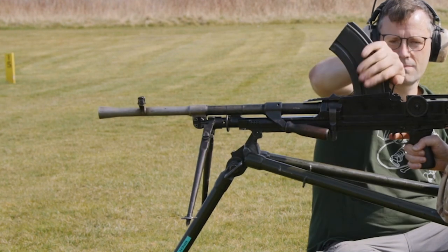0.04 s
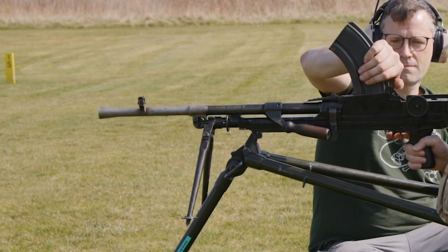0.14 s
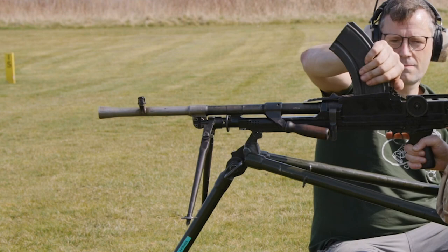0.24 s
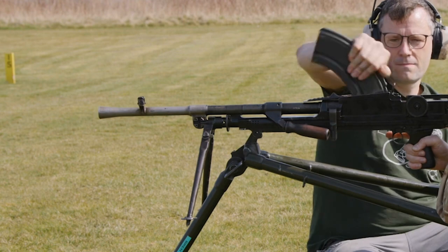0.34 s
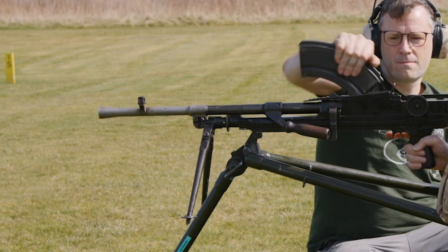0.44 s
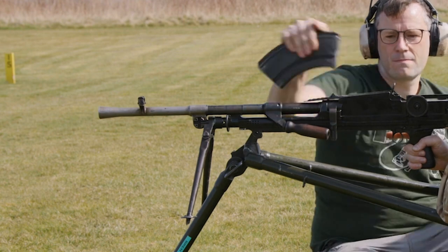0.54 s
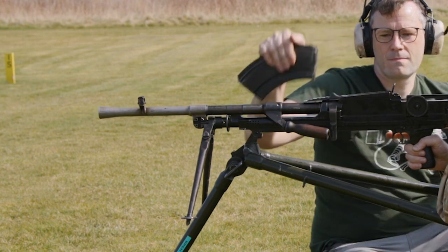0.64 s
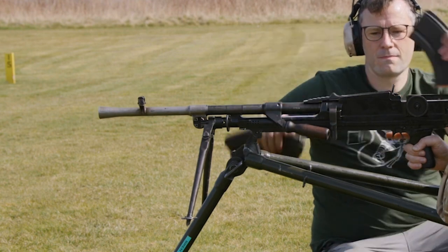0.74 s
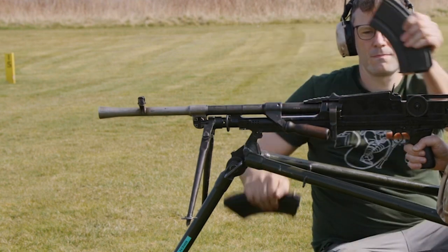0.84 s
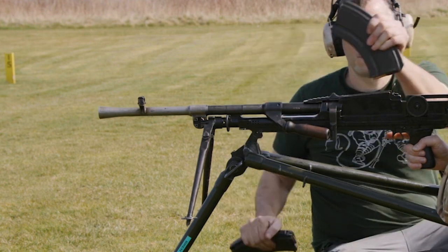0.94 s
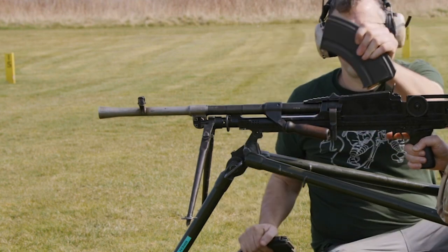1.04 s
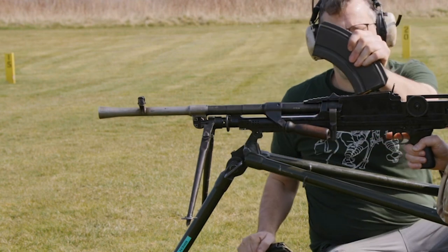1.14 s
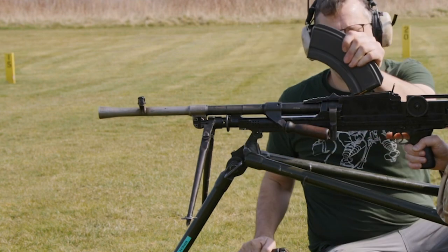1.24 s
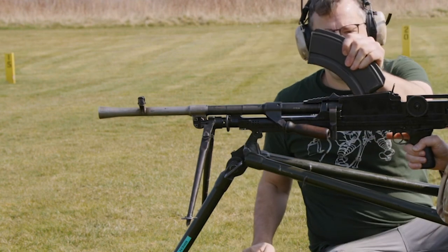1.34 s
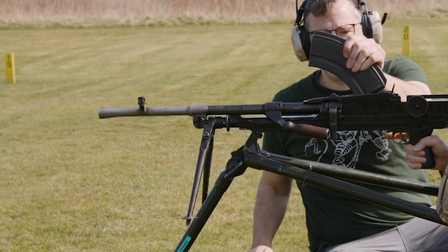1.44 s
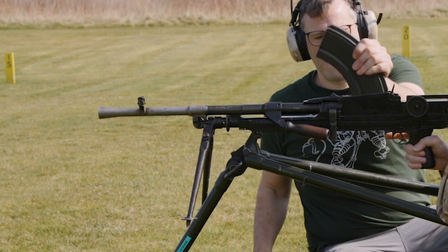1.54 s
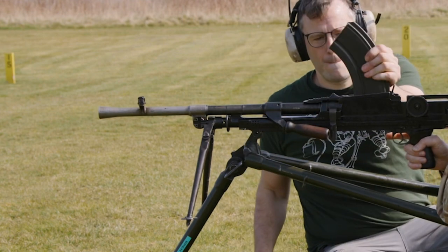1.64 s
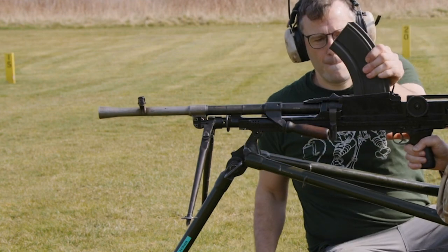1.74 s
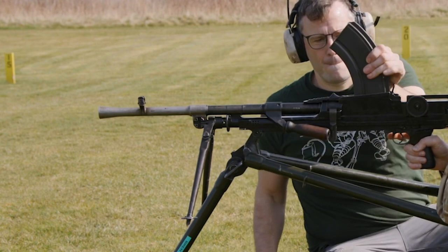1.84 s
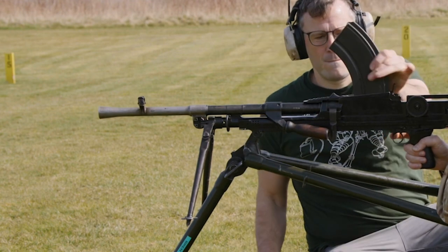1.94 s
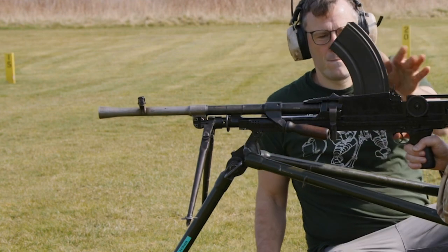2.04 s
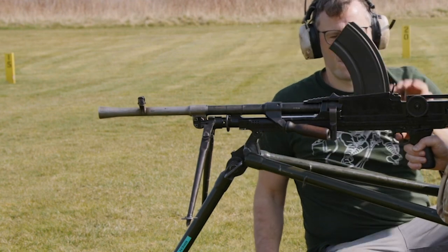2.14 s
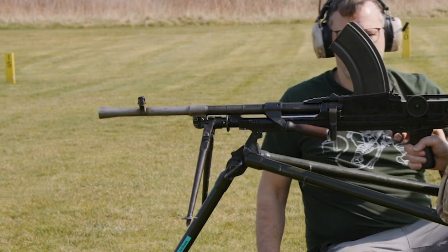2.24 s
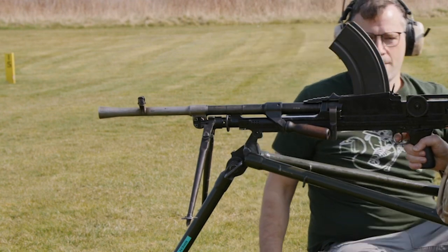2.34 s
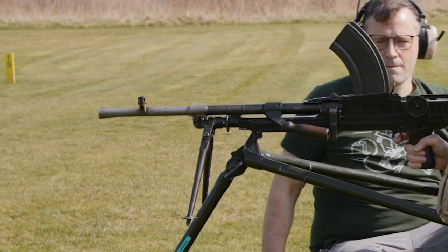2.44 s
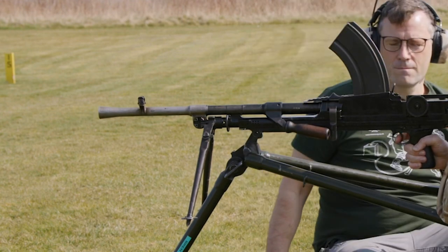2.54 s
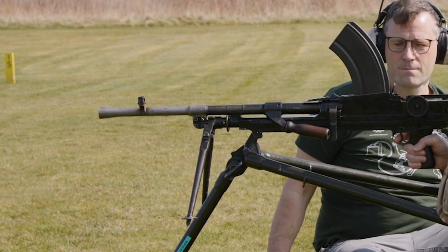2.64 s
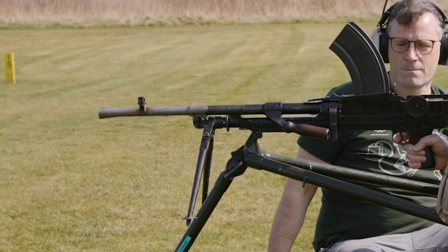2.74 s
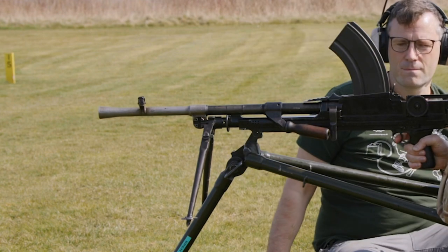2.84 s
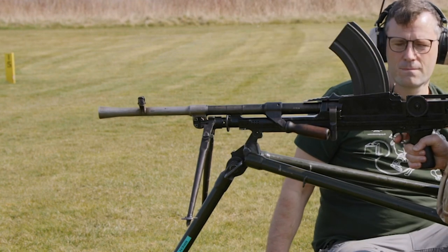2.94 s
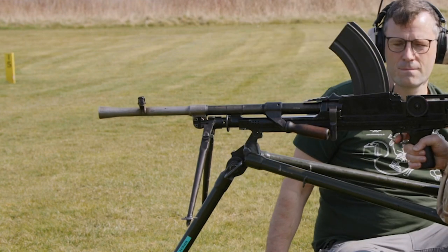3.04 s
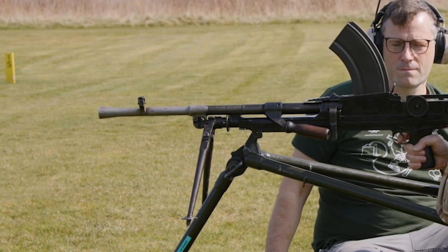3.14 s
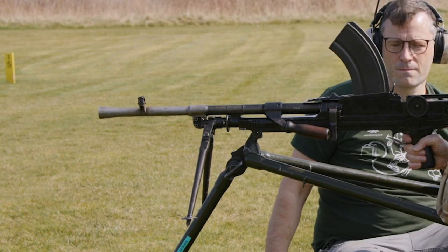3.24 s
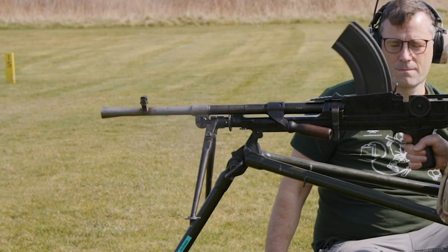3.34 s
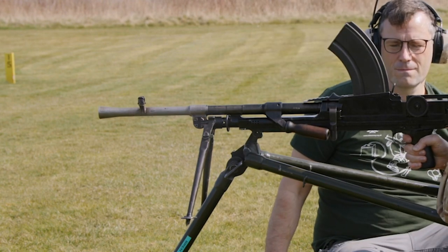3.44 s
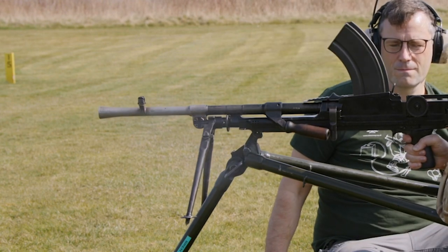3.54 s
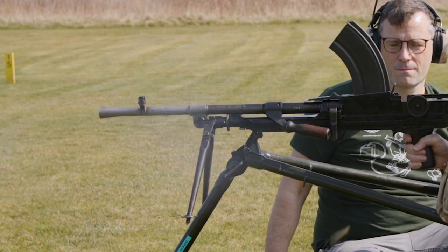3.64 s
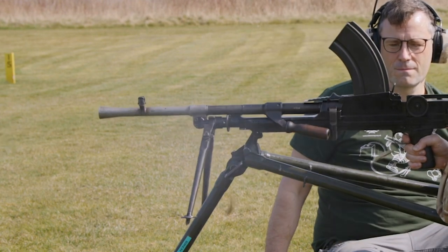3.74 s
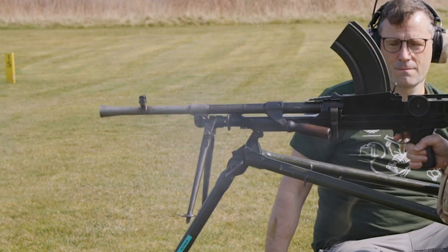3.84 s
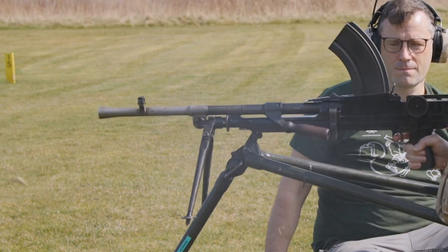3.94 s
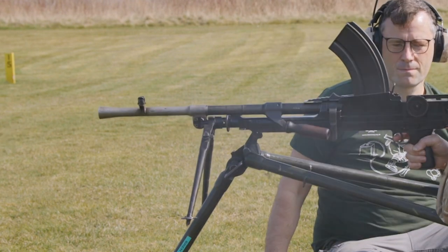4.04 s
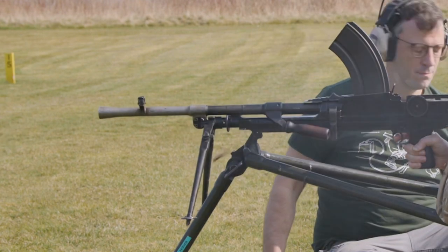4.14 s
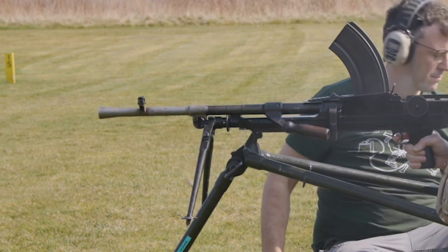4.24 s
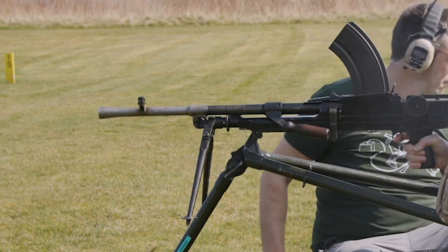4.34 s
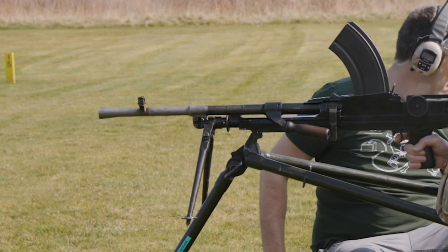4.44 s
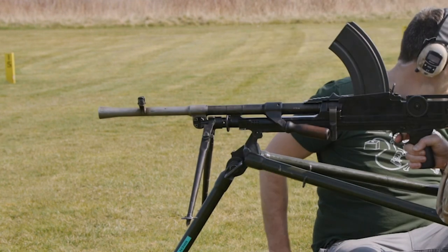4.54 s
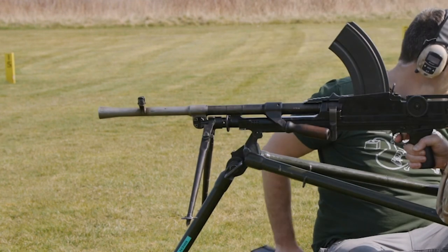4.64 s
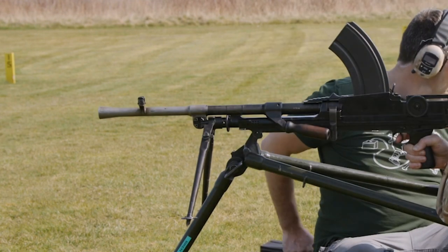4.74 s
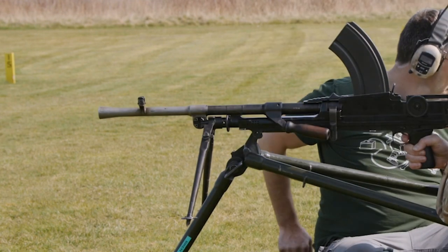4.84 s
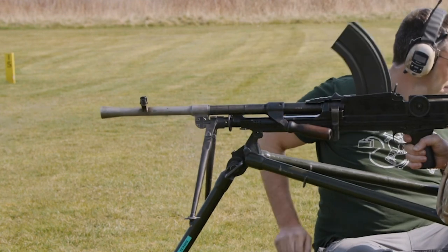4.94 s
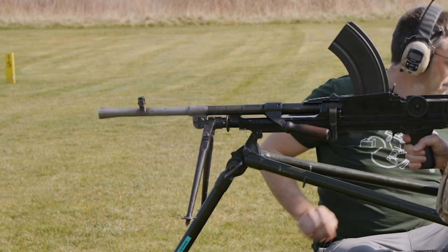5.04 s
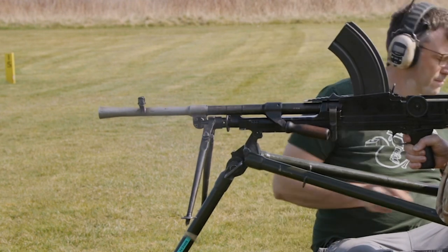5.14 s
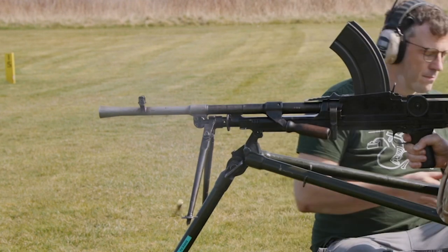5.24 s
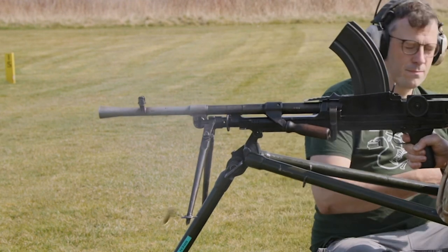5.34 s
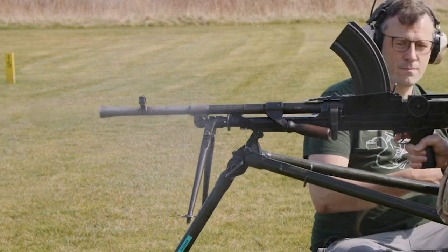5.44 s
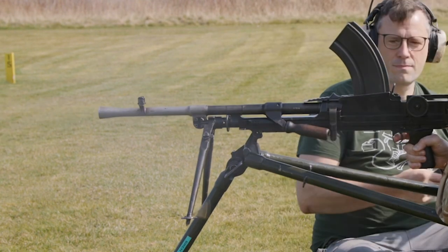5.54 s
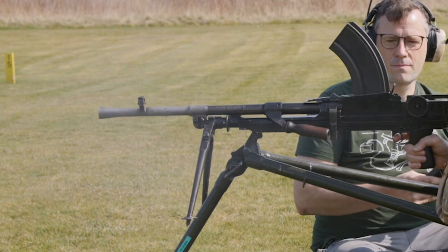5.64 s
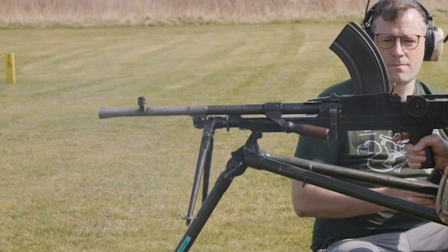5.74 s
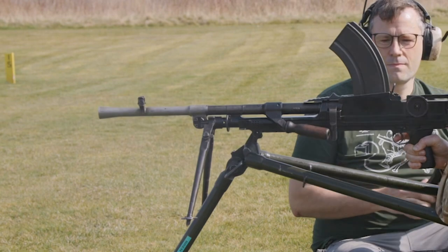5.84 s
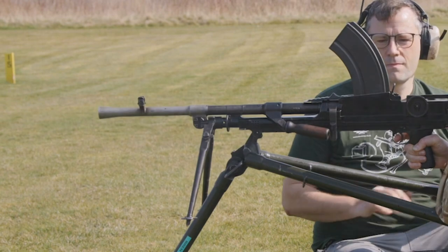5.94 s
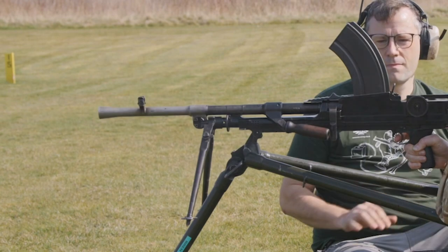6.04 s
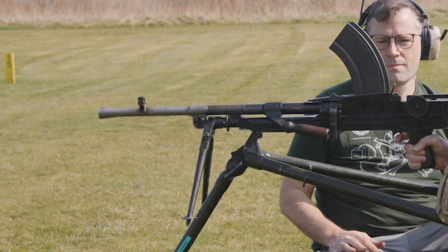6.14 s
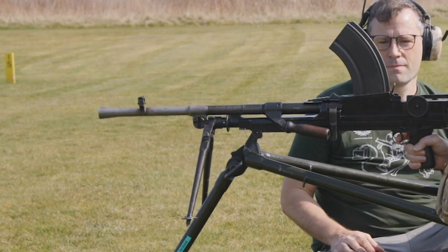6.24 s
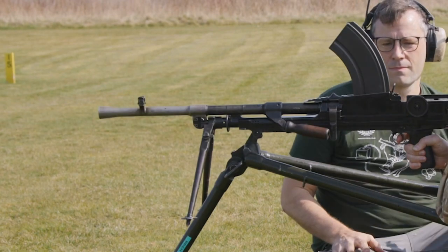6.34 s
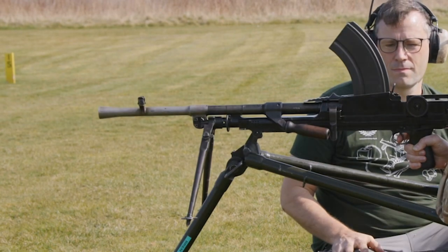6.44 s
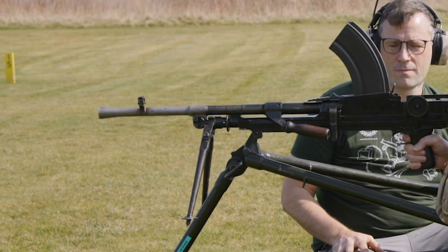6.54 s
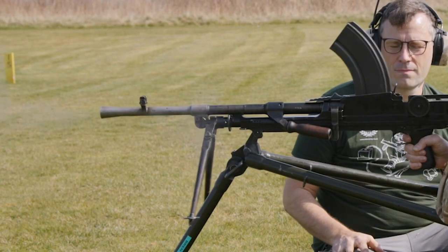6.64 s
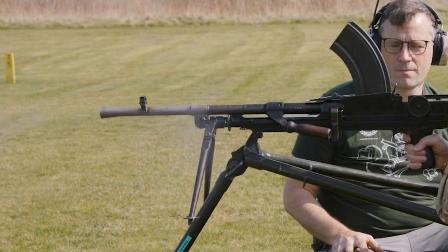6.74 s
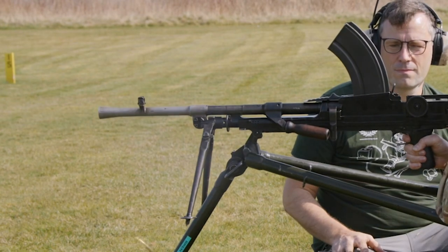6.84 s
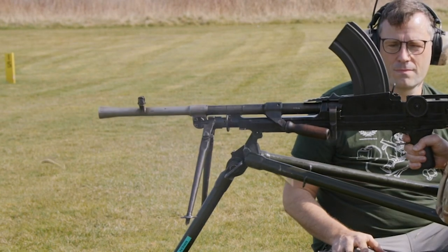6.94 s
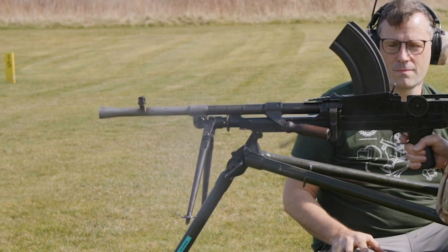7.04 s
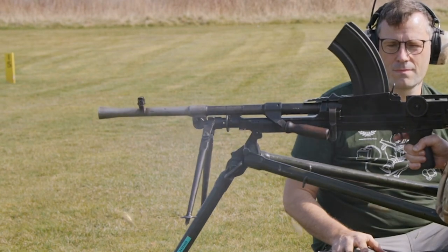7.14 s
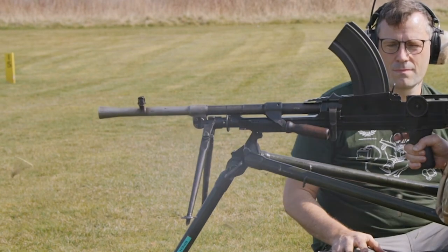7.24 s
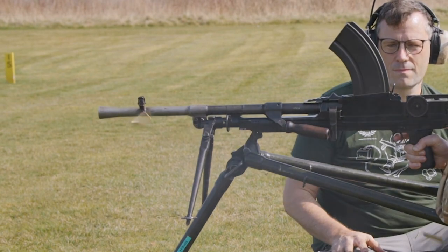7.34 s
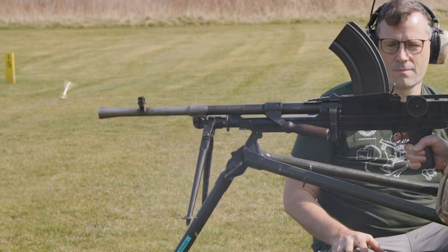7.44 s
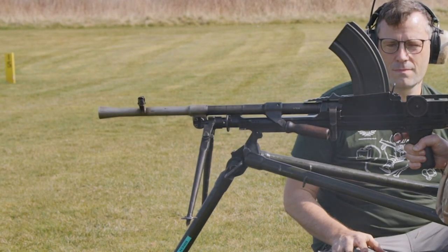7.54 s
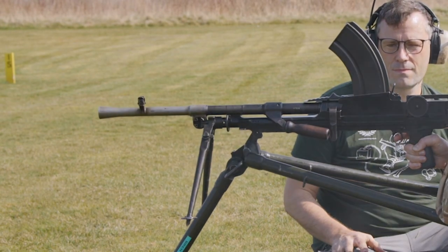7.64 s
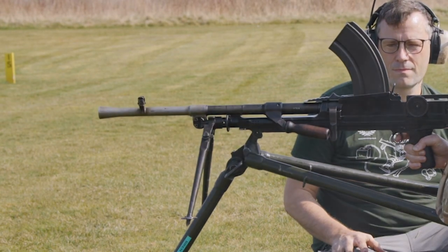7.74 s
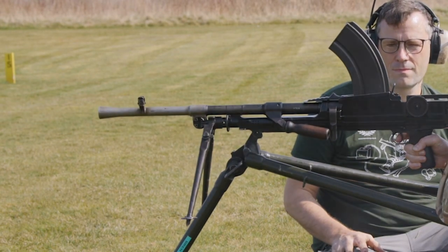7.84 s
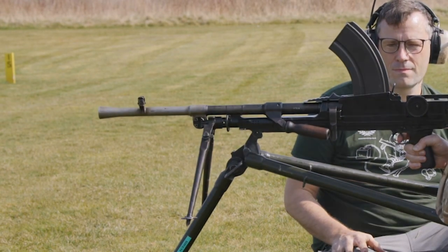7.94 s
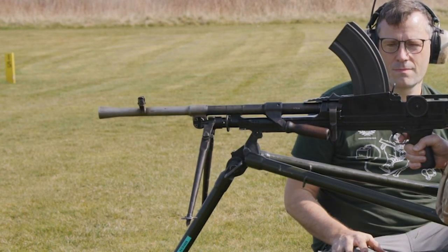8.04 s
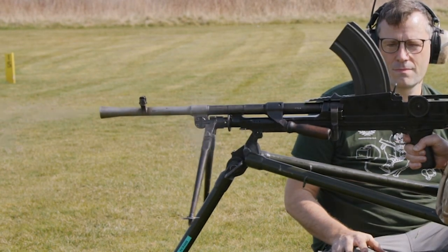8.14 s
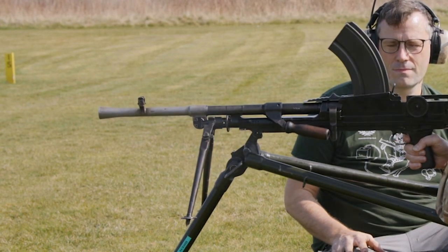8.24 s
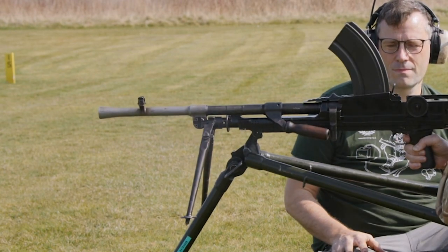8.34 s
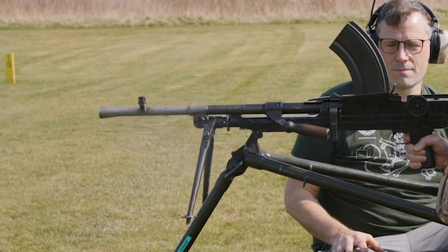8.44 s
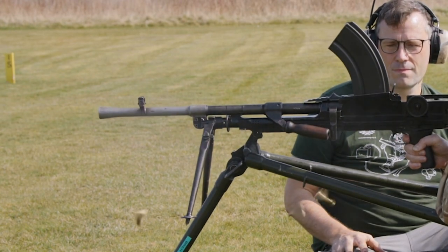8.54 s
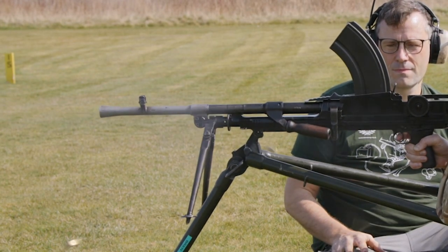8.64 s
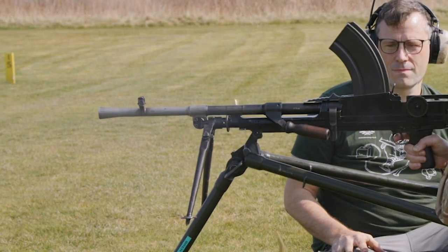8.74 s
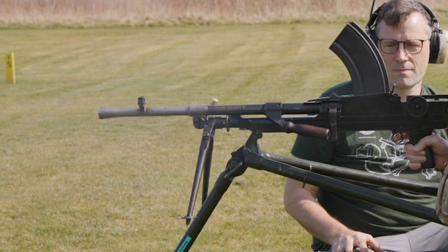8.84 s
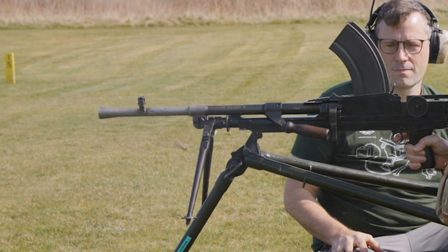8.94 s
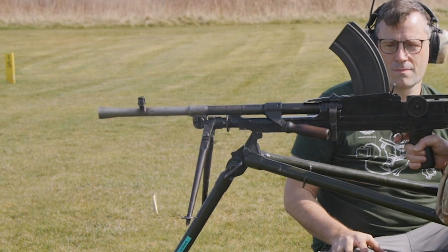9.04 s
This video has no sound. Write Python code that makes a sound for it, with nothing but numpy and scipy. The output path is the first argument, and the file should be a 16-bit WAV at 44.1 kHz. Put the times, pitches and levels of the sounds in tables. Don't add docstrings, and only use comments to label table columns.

```python
import sys
import numpy as np
from scipy import signal
from scipy.fft import rfft, irfft
from scipy.io import wavfile
from scipy.ndimage import uniform_filter1d

SR = 44100
rng = np.random.default_rng(int(sys.argv[2]) if len(sys.argv) > 2 else 0)


def dump(signal):
    limited = np.clip(np.atleast_2d(signal).T, -1, 1)
    pcm = np.round(limited * 32767).astype(np.int16)
    wavfile.write(sys.argv[1], SR, pcm)


def voltage_ratio(decibels):
    exponent = np.asarray(decibels, float) / 20
    return 10 ** exponent


N = 400428


def place(times, rows):
    out = np.zeros(N + SR + rows.shape[1])
    for s, row in zip(times, rows):
        i = int(s * SR)
        out[i:i + len(row)] += row
    return out[:N]


def columns(table):
    return np.array(table).T[:, :, None]


def decay(t, t60_s):
    return np.exp(-3 * np.log(10) * t / t60_s)


def sine(cycles):
    return np.sin(2 * np.pi * cycles)


def band(x, hz, width_hz):
    return signal.lfilter(*signal.iirpeak(min(hz, .4 * SR), hz / width_hz, SR), x)


def band3(x, hz, width_hz):
    return band(band(band(x, hz, width_hz), hz, width_hz), hz, width_hz)


def lowpass(x, hz):
    return signal.sosfilt(signal.butter(4, hz, fs=SR, output="sos"), x)


def colour(x, points):
    hz, db = np.transpose(points)
    f = np.fft.rfftfreq(x.shape[-1], 1 / SR) + 1
    gain = voltage_ratio(np.interp(np.log(f), np.log(hz), db))
    y = irfft(rfft(x) * gain, x.shape[-1])
    return y / y.std()


def walk(rate_hz):
    k = int(SR / rate_hz)
    held = np.repeat(rng.standard_normal(N // k + 1), k)
    return uniform_filter1d(uniform_filter1d(held, k), k)[:N]


def curve(points):
    return np.interp(np.arange(N) / SR, *np.transpose(points))


def ends():
    shots = np.array(SHOTS).reshape(len(BURSTS), -1, len(SHOTS[0]))
    return shots[:, 0], shots[:, -1]


# time_s, level_db
WIND_LEVEL = [(0, -60.5), (.2, -44), (.36, -45), (.42, -52), (.8, -61.5), (1.05, -51), (1.2, -56.5),
              (1.6, -50.5), (1.88, -44.5), (1.97, -56.5), (2.1, -42.5), (2.26, -48.5), (2.55, -45),
              (4, -48), (4.84, -49.5), (5.6, -56.5), (7.5, -59.5), (9.08, -53)]
# freq_hz, density_db
WIND_SPECTRUM = [(12, -32.5), (35, -9.5), (90, 0), (157, -4), (280, -18), (450, -30.5), (580, -65.5),
                 (990, -120)]
DEEP_HZ, DEEP_WIDTH_HZ, DEEP_DB, DEEP_SHARE = 36, 30, -9, .85


def wind():
    gust_db = curve(WIND_LEVEL)
    lumps = voltage_ratio(gust_db + 3.5 * walk(30)) * colour(rng.standard_normal(N), WIND_SPECTRUM)
    deep = band(band(rng.standard_normal(N), DEEP_HZ, DEEP_WIDTH_HZ), DEEP_HZ, DEEP_WIDTH_HZ)
    deep_db = DEEP_DB + DEEP_SHARE * gust_db + 3 * walk(7.3)
    return lumps + voltage_ratio(deep_db) * deep / deep.std()


# time_s, level_db
HUM_LEVEL = [(0, -59.5), (.89, -64), (1.9, -59.5), (4.8, -62), (6, -66.5), (8, -65.5), (9.08, -59.5)]
# freq_hz, density_db
HUM_SPECTRUM = [(180, -24.5), (300, -11), (607, -6), (1400, -10.5), (2610, -26), (4770, -29), (6000, -33.5),
                (16000, -42)]
ROLL_DB, ROLL_T60_S, ROLL_SHARE = -37, 0.79, 0.54


def hum():
    last = ends()[1]
    fade = decay(np.arange(SR) / SR, ROLL_T60_S)
    roll = place(last[:, 0], voltage_ratio(ROLL_DB + ROLL_SHARE * last[:, 1:2]) * fade)
    level = voltage_ratio(curve(HUM_LEVEL) + 0.9 * walk(4.6)) + roll
    return level * colour(rng.standard_normal(N), HUM_SPECTRUM)


# time_s, level_db
HISS_LEVEL = [(0, -92.5), (2, -87.5), (3.2, -73), (3.4, -100), (9.08, -100)]


def hiss():
    return voltage_ratio(curve(HISS_LEVEL)) * band(rng.standard_normal(N), 11000, 9000)


# freq_hz, width_hz, gain_db
RECEIVER = [(2350, 1300, 3), (3500, 200, 0), (4730, 840, -3), (4800, 730, -4), (6975, 2300, 0.5),
            (10600, 1700, -20.5)]
RATTLE_DB, RATTLE_T60_S = -30.5, 0.13


def knocks(rows, low_gain_db, mid_gain_db, high_gain_db):
    s, mid_db, low_db, low_hz, high_db, t60_s = columns(rows)
    t = np.arange(8192) / SR
    noise = rng.standard_normal((len(rows), 3, len(t)))
    fade = decay(t, np.clip(t60_s, .005, .2)) + voltage_ratio(RATTLE_DB) * decay(t, RATTLE_T60_S)
    fade = fade * np.minimum(t / (0.053 * t60_s), 1)

    hollow = band(band(band(noise[:, 0], 1000, 1300), 1000, 1300), 1050, 1600)
    low = voltage_ratio(low_db) * fade ** 0.73 * (0.58 * sine(low_hz * t) + 3.3 * hollow)
    low = place(s[:, 0], low)

    mid = place(s[:, 0], voltage_ratio(mid_db) * fade * noise[:, 1])
    ring = sum(voltage_ratio(db) * band(mid, hz, width_hz) for hz, width_hz, db in RECEIVER[:4])
    mid = band(band(mid, 2000, 2900) + ring, 3200, 5400)
    mid = band(mid, 3000, 6000)

    high = place(s[:, 0], voltage_ratio(high_db) * fade ** 1.215 * noise[:, 2])
    ring = sum(voltage_ratio(db) * band(high, hz, width_hz) for hz, width_hz, db in RECEIVER[3:])
    high = band(band(high, 12000, 12000) + ring, 5000, 9000)
    return voltage_ratio(low_gain_db) * low + voltage_ratio(mid_gain_db) * mid + voltage_ratio(high_gain_db) * high


# time_s, mid_db, low_db, low_hz, high_db
CLACKS = [(0.306, -14, -27, 620, -30.5), (0.4563, -38.5, -30, 606.3, -60.5),
          (.4809, -26, -36, 648.5, -55.5), (0.4892, -33.5, -39, 590, -59), (1.0894, -7, -17.5, 1055, -26),
          (1.1113, -23, -51, 969, -48.5), (1.1914, -11, -25.5, 804, -25), (1.1958, -9, -34.5, 980, -31),
          (1.251, -25, -38.5, 1017, -62.5), (1.338, -25.5, -33, 827, -43.5), (1.474, -14, -22, 1353, -37.5),
          (1.4866, -15, -27, 980, -30), (1.6132, -16.5, -32, 994, -32), (1.6292, -9.5, -32, 970, -16),
          (1.64, -23.5, -27.5, 900, -50.5), (1.8689, -24.5, -31.5, 1300, -62),
          (7.5487, -35, -54, 1448, -95.5), (7.679, -71, -47.5, 778, -84)]
CLACK_T60_S = 0.031
# time_s, mid_db, low_db, low_hz, high_db, t60_s
LATCH = (.3318, -5, -48, 996, -10, .016)
# time_s, level_db
TICKS_OUT = [(.0332, -43), (.083, -39.5), (.2633, -44.5), (.2725, -46), (.2783, -44), (.3, -44.5),
             (.321, -41), (.38, -52.5), (.355, -45), (.3914, -48.5), (.4105, -37), (.4224, -50.5),
             (.4314, -42.5)]
# time_s, level_db
TICKS_IN = [(1.15, -42), (1.1693, -27.5), (1.1746, -29), (1.2352, -32.5), (1.3179, -24), (1.3487, -26),
            (1.373, -30.5), (1.389, -40), (1.407, -44), (1.4336, -43.5), (1.4587, -38.5), (1.504, -39.5),
            (1.5195, -40.5), (1.5255, -31.5), (1.537, -43), (1.557, -41.5), (1.5665, -38), (1.672, -32.5),
            (1.6955, -34.5), (1.7175, -38), (1.7483, -29.5), (1.7757, -34), (1.9, -41.5), (1.9522, -35),
            (2.001, -43.5), (2.048, -42.5), (2.6024, -44)]
# low_db, low_hz, high_db, t60_s
EMPTY = (-6, 640, -26, .028)
FULL = (-13, 1000, -24, .034)


def hands():
    rows = [(*row, CLACK_T60_S) for row in CLACKS] + [LATCH]
    for ticks, (low_db, low_hz, high_db, t60_s) in ((TICKS_OUT, EMPTY), (TICKS_IN, FULL)):
        for s, db in ticks:
            hz = low_hz * rng.uniform(0.66, 1.1)
            rows.append((s, db, db + low_db, hz, db + high_db, t60_s))
    return knocks(rows, 5.47, -9.0, 1.7)


# time_s, peak_db, freq_hz
BUFFETS = [(.185, -35, 79.8), (.25, -37, 130), (.33, -36, 120), (.495, -44.5, 69.6), (.62, -44, 109.9),
           (1.535, -42, 65), (1.655, -34, 75), (1.87, -41.5, 109.9), (2.1, -30.5, 100.8),
           (2.49, -33.5, 124.4), (2.595, -34.5, 99.7), (2.845, -32.5, 75), (2.97, -34.5, 90)]
BUFFET_CYCLES, BUFFET_EDGE_DB = .8, -6


def buffets():
    s, db, hz = columns(BUFFETS)
    cycles = np.arange(4096) / SR * hz
    swing = sine(cycles) + voltage_ratio(BUFFET_EDGE_DB) * sine(1.9 * cycles)
    age = cycles / BUFFET_CYCLES
    return place(s[:, 0], voltage_ratio(db - 2.5) * swing * age * np.exp(1 - age))


# freq_hz, t60_s
SHEET = [(620, .07), (1790, 0.057), (2100, 0.027), (2540, 0.046), (2920, 0.035), (3305, .034),
         (3700, 0.034), (4250, 0.027), (4700, .022), (5044, .028), (5335, 0.019), (6300, .025),
         (6900, .016), (8100, .014)]
# time_s, level_db, favoured_hz, spread_octaves
BLOWS = [(.457, -36, 620, .3), (.482, -40, 620, .3), (1.0905, -36, 620, .3), (1.194, -40, 620, .3),
         (.308, -33, 2600, 0.63), (0.3319, -21.5, 5500, 0.76), (1.0898, -25.5, 2800, 1.07),
         (1.192, -29.5, 3500, .8), (1.1965, -30.5, 4200, 0.63), (1.2515, -42.5, 2900, 0.44),
         (1.339, -39.5, 2400, 0.62), (1.4748, -29, 1800, 0.82), (1.488, -31, 2600, 0.68),
         (1.566, -46, 3600, .3), (1.614, -34.5, 2200, 0.54), (1.63, -20, 5100, 0.326),
         (1.8689, -37.5, 1600, .6), (4.035, -25.5, 5500, 0.37)]


def sheet():
    s, db, favoured_hz, spread = columns(BLOWS)
    t, out = np.arange(4096) / SR, 0
    chance = rng.standard_normal((len(BLOWS), len(SHEET), 2, 1))
    for k, (hz, t60_s) in enumerate(SHEET):
        off = np.log2(hz / favoured_hz) / spread
        size = voltage_ratio(db - 6 * off ** 2 + 3 * chance[:, k, 0])
        detuned_hz = hz * (1 + 0.0071 * chance[:, k, 1])
        out = out + size * sine(detuned_hz * t) * decay(t, t60_s)
    return place(s[:, 0], out * np.minimum(t / .0006, 1))


# time_s, level_db, freq_hz, t60_s
PING = [(.345, -55, 6790, .4), (1.2, -66, 6790, .4), (1.632, -73.5, 6790, .4), (3.866, -30, 6790, .4),
        (5.468, -50, 6790, .4), (5.5075, -36, 7950, .13), (7.146, -66.5, 6790, .4),
        (8.664, -57.5, 6790, .4)]


def pings():
    s, db, hz, t60_s = columns(PING)
    t = np.arange(16384) / SR
    return voltage_ratio(1.5 * walk(60)) * place(s[:, 0], voltage_ratio(db) * sine(hz * t) * decay(t, t60_s))


# freq_hz, density_db
SCRAPE = [(350, -26), (600, 1.5), (4480, -4), (6000, -3.5), (7800, -9.5), (14400, -18), (15800, -29),
          (16500, -45)]


def scrape(count, size):
    chance = rng.standard_normal((2, count, size))
    grain_db = 3.57 * 9.7 * uniform_filter1d(chance[0], size=64)
    return voltage_ratio(grain_db) * colour(chance[1], SCRAPE)


# start_s, end_s, level_db
SLIDES = [
    (0.346, .44, -70.5),
    (1.106, 1.264, -60),
    (1.326, 1.473, -64.5),
    (1.495, 1.63, -61.5),
    (1.632, 1.821, -70),
    (1.878, 2.067, -70),
]
TAKE_UP_S = .014


def slides():
    rows = [(go - TAKE_UP_S, shot, db) for (go, *_, db), shot in zip(BURSTS, ends()[0][:, 0])]
    rows += list(SLIDES)
    start, end, db = columns(rows)
    t = np.arange(8192) / SR
    shape = np.clip(np.minimum(t / 0.022, (end - start - t) / .004), 0, 1) ** 2
    return band(place(start[:, 0], voltage_ratio(db) * shape * scrape(len(rows), len(t))), 2200, 5000)


# start_s, length_s, from_hz, to_hz, level_db
BIRD = [
    (2.418, 0.238, 4540, 4900, -78.5),
    (2.773, 0.061, 4300, 4250, -86.5),
    (3.132, 0.048, 4710, 4500, -73),
    (4.691, .055, 5460, 6260, -73),
    (4.74, 0.041, 6350, 4610, -76),
]


def bird():
    s, length_s, from_hz, to_hz, db = columns(BIRD)
    part = np.minimum(np.arange(10000) / SR / length_s, 1)
    cycles = np.cumsum(from_hz + (to_hz - from_hz) * part, axis=1) / SR
    return place(s[:, 0], voltage_ratio(db) * np.sin(np.pi * part) * sine(cycles))


# sear_s, sear_db, feed_db, caught_db, slide_db
BURSTS = [
    (3.228, 10, 2.5, -3.5, -34),
    (4.851, -6, 0, -0.5, -35),
    (6.5425, 2.5, -2, -3, -35.5),
    (8.0686, -15, -7, -3.5, -39.5),
]
CAUGHT_S = [3.8635, 5.467, 7.1444, 8.6617]
# mid_db, low_db, high_db, t60_s
FEED = [
    (-9.5, -15.5, -24.5, .05),
    (-13, -15, -25, 0.054),
    (-4.5, -15, -14.5, 0.028),
]
# first_s, second_s, third_s
FEED_S = [(3.2454, 3.2873, 3.305), (4.863, 4.901, 4.94), (6.557, 6.589, 6.605), (8.0794, 8.1083, 8.11)]
# mid_db, low_db, high_db, t60_s
SEAR = (-13.5, -32, -21.5, 0.0151)
# mid_db, low_db, high_db, t60_s
CATCH = (-3, -28.5, -11.5, 0.01)
# time_s, mid_db, low_db, high_db
STRAYS = [(3.2185, -32, -42, -62), (3.2393, -7, -11.5, -26), (3.2717, -22.5, -22, -39),
          (3.2884, -5, -17.5, -20.5), (3.318, -12.5, -16, -21), (3.333, -8, -21, -27),
          (3.392, -10.5, -23, -21), (3.4256, -14, -12, -22.5), (4.0343, -17, -45, -27),
          (4.8715, -13, -22, -32.5), (4.886, -25, -23.5, -37), (4.895, -19.5, -29, -37.5),
          (8.086, -20.5, -24, -35), (5.5063, -12.5, -29, -24.5), (6.552, -18.5, -29.5, -38),
          (6.6755, -8, -25.5, -30), (8.1325, -18, -23.5, -28.5)]
STRAY_T60_S = .036
LOCK_LOW_DB, LOCK_HIGH_DB, LOCK_T60_S = -18.5, -5, .03
BOLT_RING_HZ = 666


def bolt():
    def shifted(s, gain_db, kind):
        *levels_db, t60_s = kind
        return (s, *(gain_db + np.array(levels_db)), t60_s)

    rows = [(s - lead_s, db, db + LOCK_LOW_DB, db + LOCK_HIGH_DB, LOCK_T60_S)
            for s, _, lead_s, db in SHOTS]
    rows += [(*row, STRAY_T60_S) for row in STRAYS]
    for (go, sear_db, feed_db, caught_db, _), met, caught in zip(BURSTS, FEED_S, CAUGHT_S):
        rows += [shifted(go, sear_db, SEAR), shifted(caught, caught_db, CATCH)]
        rows += [shifted(s, feed_db, kind) for s, kind in zip(met, FEED)]
    low_hz = BOLT_RING_HZ * rng.uniform(.85, 1.55, len(rows))
    return knocks(np.insert(rows, 3, low_hz, axis=1), 0.1, -7.5, 2.9)


# time_s, far_db, lock_lead_s, lock_db
SHOTS = [(3.354, 12, 0.01584, -3.5), (3.472, 8.5, 0.0104, -4), (3.583, 5, .0102, -7),
         (3.6934, 6.5, 0.0103, -3.5), (3.8058, 8.5, 0.0108, -4.5), (4.9556, 5, 0.014, -4.5),
         (5.0741, -1.5, 0.01164, -4.5), (5.1876, 3.5, 0.0114, -3.5), (5.301, 2, 0.0111, -2.5),
         (5.4124, -1, 0.0097, -4), (6.6407, 5.5, 0.01404, -3.5), (6.7572, -3.5, 0.0103, -7.5),
         (6.8675, 0.5, 0.01244, -4.5), (6.9782, 1, .0101, -10.5), (7.0874, -4.5, 0.00795, -6),
         (8.1611, 6.5, 0.0122, -4.5), (8.2754, -5, 0.0104, -7), (8.3859, -4, 0.0097, -7),
         (8.496, -3, 0.0091, -4), (8.6045, -14, 0.0083, -4)]
# freq_hz, level_db, t60_s
SWINGS = [(65, 7.5, 0.038), (109.1, 16, 0.0376), (229, 13, 0.0408), (356.04, 12.5, 0.048),
          (620, 19, 0.0288), (900, 22.5, 0.018)]
JET_DB, JET_T60_S, JET_HZ, JET_WIDTH_HZ = 27.5, 0.03455, 2030, 3000
SHOCK_DB, SHOCK_S = 17, .0014


def blasts():
    t = np.arange(2048) / SR
    swing = sum(-voltage_ratio(db) * sine(hz * t) * decay(t, t60_s) for hz, db, t60_s in SWINGS)
    jet = band(rng.standard_normal((len(SHOTS), len(t))), JET_HZ, JET_WIDTH_HZ)
    wave = swing + voltage_ratio(JET_DB) * jet * decay(t, JET_T60_S)
    wave = wave * np.minimum(t / 0.0006, 1)
    wave = wave + voltage_ratio(SHOCK_DB) * np.sin(np.pi * np.minimum(t / SHOCK_S, 1))
    return place(np.array(SHOTS)[:, 0], .2 * wave)


# after_shot_s, cycling_db, caught_db, t60_s
STROKES = [
    (0, -15.5, -21.5, .08),
    (.028, -17, -14.5, 0.041),
    (.035, -30, -29.5, 0.27),
    (.063, -25.5, -57.5, 0.13),
    (0.1, -24, -45, .09),
]
STROKE_RISE_S = 0.027
PISTON_DELAY_S, PISTON_HZ, PISTON_DB, PISTON_T60_S = .035, 4950, -29, .06


def action():
    s, t = np.array(SHOTS)[:, 0], np.arange(8192) / SR
    when, cycling_db, caught_db, t60_s = columns(STROKES)
    slope = np.where(t > when, (t - when) / t60_s, (when - t) / STROKE_RISE_S)
    stroke = decay(slope, 1) * (t < .14)
    cycling = (voltage_ratio(cycling_db) * stroke).sum(axis=0)
    caught = (voltage_ratio(caught_db) * stroke).sum(axis=0)
    last = np.diff(s, append=99)[:, None] > .5
    size = voltage_ratio(PISTON_DB + 2.5 * rng.standard_normal((len(s), 1)))
    since = t - PISTON_DELAY_S
    ring = size * sine(PISTON_HZ * np.maximum(since, 0)) * decay(since, PISTON_T60_S)
    return place(s, np.where(last, caught, cycling) * scrape(len(s), len(t)) + ring)


# delay_s, peak_db, freq_hz, t60_s, loose_share
ECHOES = [(.0035, -20, 80, .08, 0), (0.0138, -18, 200, 0.04, 0.1), (0.0182, -2.5, 620, 0.006, 0),
          (.0282, -11.5, 5000, .008, .6), (.0205, -7.5, 563.3, .012, 0), (0.0272, -8.5, 2381, 0.02, 0.3),
          (0.0455, -16.5, 308.7, 0.038, 0.4), (.0603, -4.5, 1261, 0.012, 0.25),
          (0.0615, -16, 2400, 0.023, 1), (0.068, -15.5, 505.9, 0.0081, .2), (.082, -21.5, 4073, 0.019, 1),
          (0.064, -15.5, 302.6, 0.07, .45), (.0806, -14, 2200, .006, .3), (0.092, -14, 1600, .014, 0.5),
          (.0925, -22.5, 748.8, .03, .4), (.0955, -22, 5000, .008, .8), (0.113, -27.5, 3500, 0.019, .6),
          (.1195, -30, 3293, .012, .6), (.126, -7.5, 2300, .012, .5), (.402, -31, 4800, .011, 0.6),
          (.352, -46.5, 1700, .015, .6), (0.496, -39.5, 2317, 0.06, 0.8), (.505, -38.5, 2010, .06, .9),
          (.515, -42.5, 2489, .07, .9), (0.497, -52, 4300, 0.12, 1), (.545, -53.5, 4980, .015, 0.9)]
# delay_s, peak_db
SLAPS = [
    (.0612, -14),
    (.0807, -5.5),
    (.0818, -13),
    (.084, -16),
]
SLAP_WIDTH_S = .000036
ECHO_SHARE = 0.62
FAR_S, FAR_TOP = .1, 2.1


def echoes():
    s, far_db = np.transpose(SHOTS)[:2]
    t, out = np.arange(4096) / SR, 0
    for delay, db, hz, t60_s, loose in ECHOES:
        noise = band3(rng.standard_normal((len(s), len(t))), hz, hz * 1.3)
        if delay > FAR_S:
            noise = lowpass(noise, FAR_TOP * hz)
        pulse = (1 - loose) * sine(hz * t) + loose * noise / noise.std()
        share = ECHO_SHARE * (delay > .12)
        size = voltage_ratio(db + share * far_db + 1.2 * rng.standard_normal(len(s)))[:, None]
        rise = 1 - np.exp(-t / (0.044 / hz + 0.0023 * delay))
        out = out + place(s + delay, size * pulse * rise * decay(t, t60_s))
    return out


def slaps():
    s = np.array(SHOTS)[:, 0]
    u = np.arange(64) / SR / SLAP_WIDTH_S - 4
    swing, out = u * np.exp((1 - u ** 2) / 2), 0
    for delay, db in SLAPS:
        chance = rng.standard_normal((len(s), 2))
        out = out + place(s + delay + .0002 * chance[:, 0], voltage_ratio(db + 2 * chance[:, 1:]) * swing)
    return out


# freq_hz, near_db, near_t60_s, far_db, far_t60_s
FIELD = [(90, -26, 0.18, -62, 0.42), (194.7, -25.5, 0.42, -44.5, 0.97), (380, -26, 0.33, -58, .7),
         (705, -31, 0.17, -64.5, 2.4), (1400, -32.5, 0.2, -54.5, 3.6), (2200, -34, 0.26, -52.5, 3.335),
         (3200, -43.5, 0.6, -54.5, 3.2), (4900, -41, 0.35, -52, 1.7), (7300, -30, 0.17, -55, .9),
         (11000, -42, 0.18, -66, .6)]
EDGE_S, EDGE_DB = .53, -4


def field():
    t, near, far = np.arange(2 * SR) / SR, 0, 0
    patches = walk(30)
    for hz, near_db, near_t60_s, far_db, far_t60_s in FIELD:
        noise = lowpass(band3(rng.standard_normal(len(t)), hz, hz * .75), 1.5 * hz)
        noise = noise / noise.std()
        near = near + voltage_ratio(near_db) * decay(t, near_t60_s) * noise
        patch_db = (4.9 * patches + 4.2 * walk(34))[:len(t)]
        level_db = far_db + EDGE_DB * (t > EDGE_S) + patch_db
        far = far + voltage_ratio(level_db) * decay(t, far_t60_s) * noise
    s, shot_far_db = np.transpose(SHOTS)[:2]
    return place(s + .008, near + voltage_ratio(shot_far_db)[:, None] * far)


# time_s, pitch_factor, main_db, lower_db, top_db
CASES = [(4.036, 1, -34, -64, -52), (4.249, .997, -39, -49, -58), (4.263, .995, -38.5, -39, -36),
         (5.508, 1, -36, -60, -79), (5.88, 1, -80, -85, -99), (5.975, 1.01, -85.5, -82, -99),
         (7.171, 1, -61, -66, -82), (7.322, 1.007, -37, -50, -78), (7.92, 1.006, -75, -84, -95),
         (8.674, .99, -36, -61, -75), (8.807, 1.006, -51.5, -59, -76), (8.881, 1.007, -50, -63, -80),
         (8.931, 1.007, -45, -53, -85)]
# freq_hz, t60_s, pitch_power
BRASS = [(7640, 0.14, 4), (10330, 0.26, 1), (11120, 0.25, 1), (15700, .17, 1)]
TUMBLE_HZ, TUMBLE_DEPTH, CASE_TICK_DB = 42, .55, -7


def cases():
    s, pitch, main_db, lower_db, top_db = columns(CASES)
    t = np.arange(16384) / SR
    chance = rng.random((len(CASES), len(BRASS), 2, 1))
    tick = band(rng.standard_normal((len(CASES), len(t))), 12000, 7000) * decay(t, 0.01205)
    out = voltage_ratio(main_db + CASE_TICK_DB) * tick
    levels_db = (lower_db, lower_db - 2.0, main_db, top_db)
    for k, ((hz, t60_s, power), db) in enumerate(zip(BRASS, levels_db)):
        tumble_hz = TUMBLE_HZ * (0.8 + .8 * chance[:, k, 0])
        throb = 1 + TUMBLE_DEPTH * sine(tumble_hz * t + chance[:, k, 1])
        out += voltage_ratio(db) * throb * sine(hz * pitch ** power * t) * decay(t, t60_s)
    return place(s[:, 0], out)


def scene():
    air = wind() + hum() + hiss() + buffets()
    magazines = hands() + sheet() + pings() + slides()
    gun = bolt() + blasts() + action() + echoes() + slaps() + field() + cases()
    return (air + magazines + bird() + gun)[None]


def roll_off(x):
    return signal.sosfilt(signal.butter(12, 16970, fs=SR, output="sos"), x)


# after_shot_s, top, bottom (full scale 1)
LIMITS = [(0, .4, .5), (.003, .3, .54), (.008, .22, .53), (.013, .27, .44), (.03, .42, .42),
          (.055, .62, .62)]


def record(dry):
    x = signal.sosfilt(signal.butter(2, 40, "high", fs=SR, output="sos"), dry)
    t, s = np.arange(N) / SR, np.array(SHOTS)[:, 0]
    since = t - np.append(-1, s)[np.searchsorted(s, t)]
    when, top, bottom = np.transpose(LIMITS)
    x = np.clip(x, -np.interp(since, when, bottom), np.interp(since, when, top))
    mix = signal.sosfilt(signal.ellip(8, .2, 60, 15900, fs=SR, output="sos"), x)
    return roll_off(mix)


dry = scene()
out = record(dry)
dump(out)
```